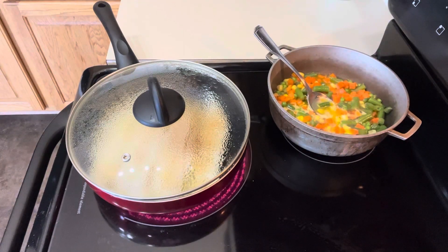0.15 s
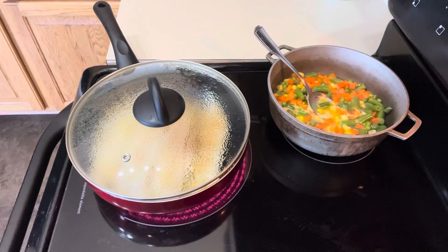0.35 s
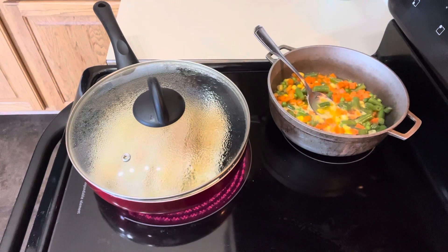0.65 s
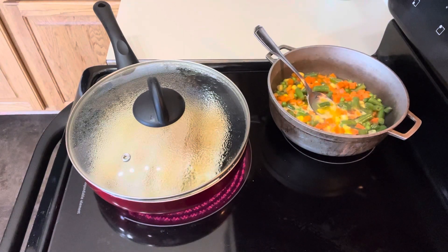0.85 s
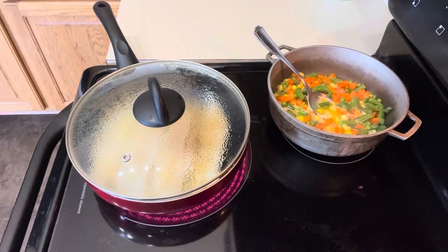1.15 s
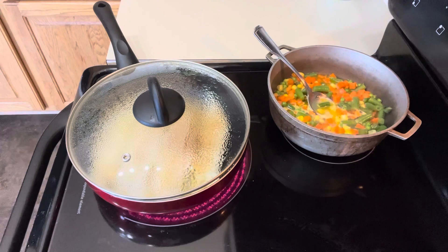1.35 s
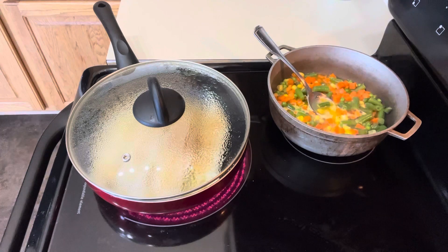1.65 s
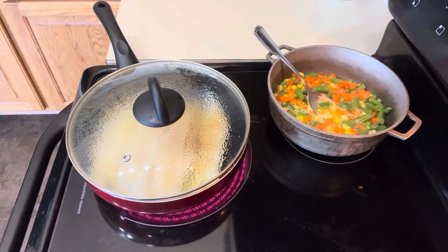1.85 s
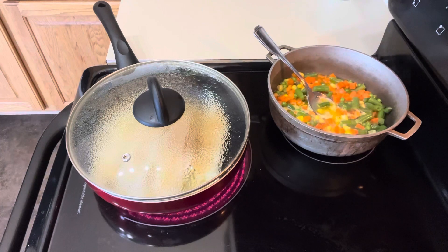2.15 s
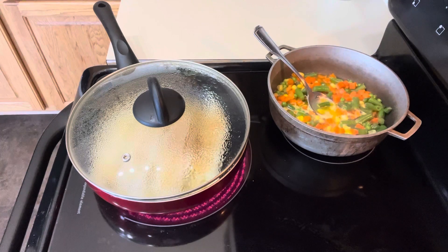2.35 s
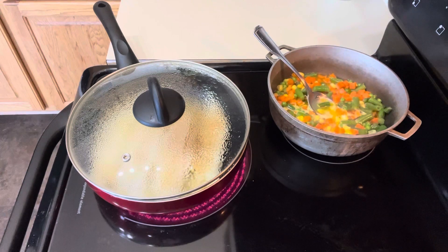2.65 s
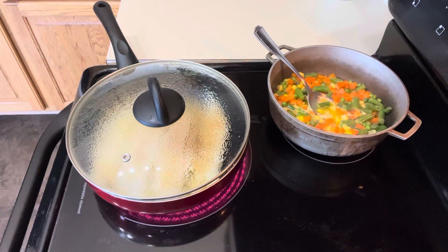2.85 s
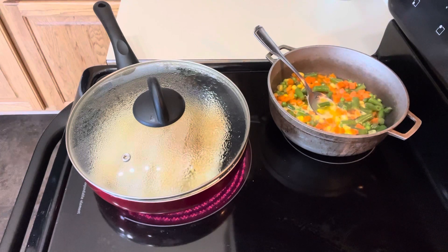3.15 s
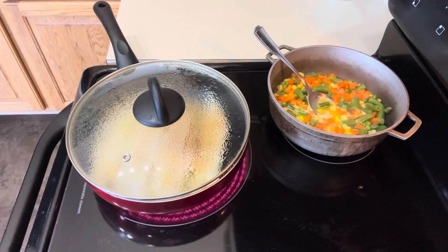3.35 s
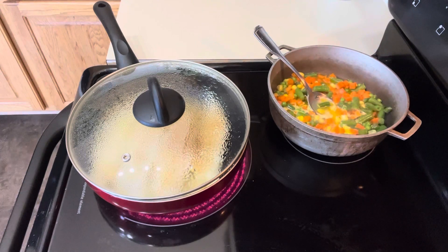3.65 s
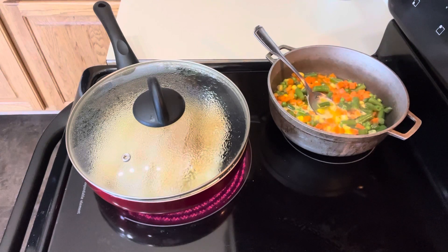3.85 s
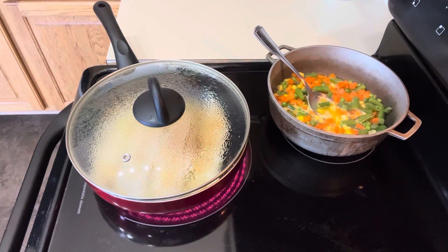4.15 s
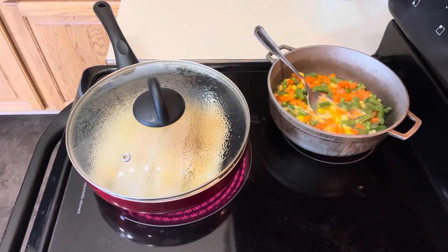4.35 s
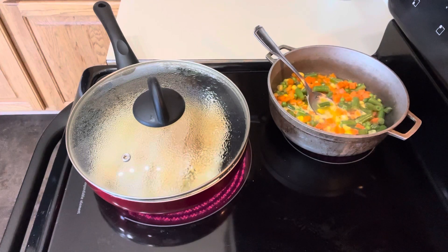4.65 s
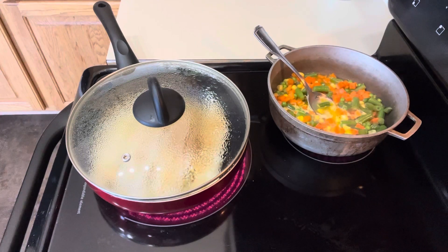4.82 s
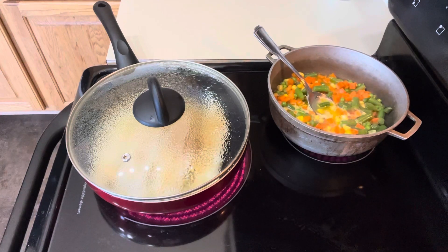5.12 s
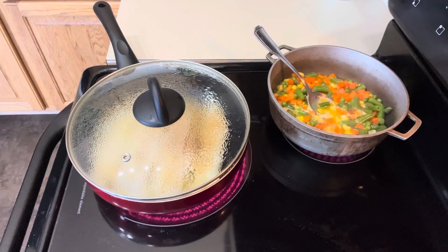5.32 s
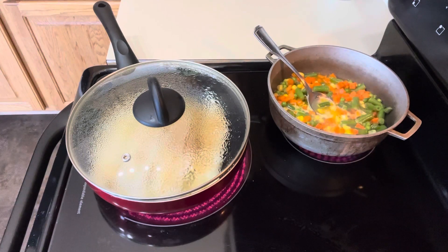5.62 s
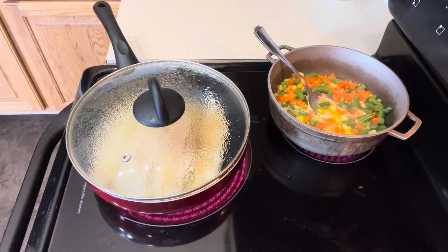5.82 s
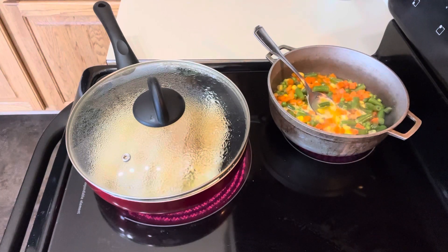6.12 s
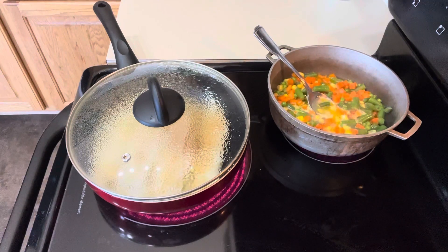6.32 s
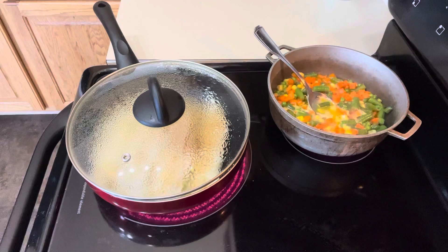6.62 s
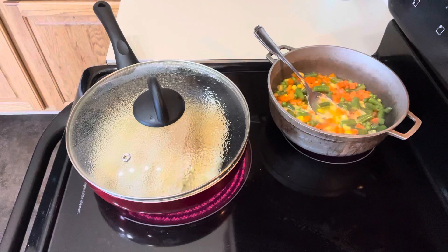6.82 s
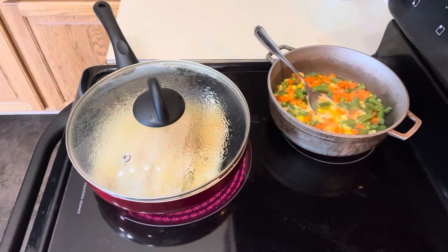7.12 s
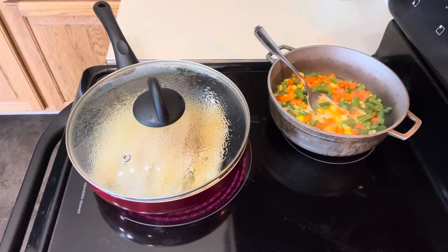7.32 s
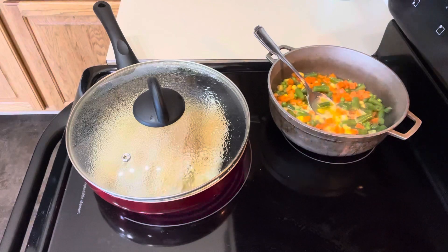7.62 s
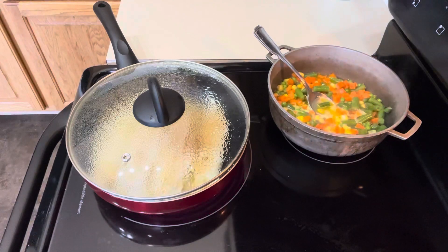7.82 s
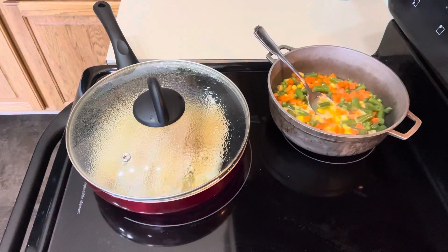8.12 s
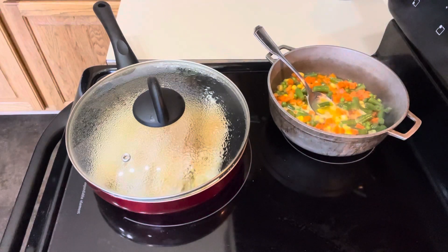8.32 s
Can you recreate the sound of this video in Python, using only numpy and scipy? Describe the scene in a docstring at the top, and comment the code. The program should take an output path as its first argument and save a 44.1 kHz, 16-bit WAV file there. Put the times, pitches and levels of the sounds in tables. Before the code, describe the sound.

A faint, fine sizzle of food frying in butter under a lid runs from start to finish, shimmering with tiny bubble crackles and a hollow pan resonance, slowly rising a little. Low room noise and a soft burner hum sit beneath; a second burner joins the hum from 3 to 6 s, and the first stops about 6.6 s. Close dull hand bumps and scrapes cluster in the first 0.8 s, strongest near 0.4, and again at 1.1. Two airy steam puffs pass at 1.5-1.6, faint steps and a rustle near 2.1. Hollow finger taps and scuffs come at 2.9, 3.9, 4.9-5.1 and 5.9. Small fat spits snap at 3.1, 3.75, 5.8 and 6.3. At 7.2 a spit sprays, then at 7.27 a loud, sharp wooden knock with a brief rattle and short kitchen reverberation. A deep, soft footfall thuds at 8.1.

```python
"""Fish fries quietly in butter under a glass lid on an electric stove, heard at a hand-held camera's two microphones.
From the start noise and bubble clicks sizzle through the pan's resonances, over low room noise and a burner's hum;
soft bumps and taps ring the camera body as dying sines, noise makes scrapes and rustles, and fat spits now and then.
Two puffs of steam pass at 1.5 s, faint steps at 2 s, and a second burner's sine hums from 3 to 6 s.
Late on, wood modes and room noise make one firm knock, then dying floor modes make a deep footfall."""
import sys
import numpy as np
from scipy import signal
from scipy.fft import rfft, irfft, next_fast_len
from scipy.io import wavfile
from scipy.ndimage import uniform_filter1d

SR = 44100
rng = np.random.default_rng(int(sys.argv[2]) if len(sys.argv) > 2 else 0)


def wav_out(sig):
    """Save sig, one row per channel (or a flat mono array), as 16-bit PCM at SR to the path in sys.argv[1]."""
    wavfile.write(sys.argv[1], SR, np.round(np.clip(np.atleast_2d(sig).T, -1, 1) * 32767).astype(np.int16))


N = 373517
TIME = np.arange(N) / SR

# noise colour of dull contact with the camera case: f/Hz, level/dB
TAP_COLOUR = [(100, -8), (220, -1), (320, 3), (440, -14), (575, 3), (700, -16), (900, -8), (1500, -24),
              (4000, -49)]


def amp(db):
    """Turns decibels into an amplitude factor."""
    return 10 ** (np.asarray(db) / 20)


def unit(x):
    """Scales to rms 1."""
    return x / np.sqrt(np.mean(x ** 2) + 1e-20)


def read(points, hz):
    """Reads a spectrum on a log-frequency axis."""
    f, value = np.transpose(points)
    return np.interp(np.log(hz + 1), np.log(f + 1), value)


def add(mix, s, sound):
    """Mixes a sound in at time s."""
    start = max(round(s * SR), 0)
    part = mix[:, start:][:, :sound.shape[-1]]
    part += sound[..., :part.shape[1]]


def drift(low_hz, high_hz):
    """Slow random wander of rms 1, summed from sines that weaken towards the fast end."""
    t = TIME[::128]
    rates = np.geomspace(low_hz, high_hz, 24)
    waves = sum(np.sin(2 * np.pi * (f * t + rng.random())) / np.sqrt(f) for f in rates)
    return np.interp(TIME, t, unit(waves))


def swell(middle, half):
    """A smooth rise and fall of height 1, down to 1/e at half seconds from its middle."""
    return np.exp(-((TIME - middle) / half) ** 2)


def ports(pair, gain, spread=1):
    """Colours two unrelated signals by gain(Hz) and blends them as the two microphone ports hear them."""
    # likeness of the two ports before the spread power: f/Hz, likeness/0-1
    likeness = [(50, .97), (400, .88), (600, .5), (1100, .55), (1500, .25), (1780, .65), (2100, .25),
                (2350, .7), (2600, .12), (3000, .35), (3500, .3), (5200, .15), (6700, .35), (7200, .82),
                (7700, .98), (8200, .98), (9900, .55), (10600, .99), (12200, .99), (13300, .55), (14800, 1)]
    # phase by which the left port leads: f/Hz, lead/rad
    lead = [(50, 0), (400, -.35), (1800, 0), (2350, -3), (2950, -2), (3500, 0), (5400, .3), (6400, 2.7),
            (8200, 3.2), (9700, 4.5), (10600, 6.2), (12300, 6.3), (13200, 7.2), (14700, 9.4)]
    # left port over right port: f/Hz, level/dB
    balance = [(50, -2.5), (150, -4.5), (330, -3), (480, -7), (750, -2), (1100, -4.5), (1600, 0),
               (2400, -1.5), (3500, -2), (6200, -4), (7800, -2), (15000, 0.5)]
    size = next_fast_len(pair.shape[1])
    hz = np.fft.rfftfreq(size, 1 / SR)
    a, b = rfft(pair, size)
    same = np.clip(read(likeness, hz), 0, 1) ** spread
    side = amp(read(balance, hz) / 2)
    right = (same * a + np.sqrt(1 - same ** 2) * b) * np.exp(-1j * read(lead, hz))
    blend = np.array([a * side, right / side])
    return irfft(blend * gain(hz), size)[:, :pair.shape[1]]


def hiss(colour, size, spread=1):
    """Stereo noise of rms 1 with a given colour."""
    white = rng.standard_normal((2, size))
    return unit(ports(white, lambda hz: amp(read(colour, hz)), spread))


def burst(colour, t60, rise):
    """A short coloured noise that starts softly and dies away by 60 dB in t60 seconds."""
    t = np.arange(SR // 3) / SR
    return hiss(colour, size=len(t)) * amp(-60 * t / t60) * (1 - np.exp(-t / rise))


def ring(modes, rise):
    """Dying sines, started softly; the right port is nearer."""
    t = np.arange(SR) / SR
    tone = sum(amp(db - 60 * t / t60) * np.sin(2 * np.pi * hz * t) for hz, db, t60 in modes)
    return tone * (1 - np.exp(-t / rise)) * amp([[-1.6], [1.4]])


def reverberation(colour):
    """The kitchen's tail: each band of a noise dies at its own speed."""
    # decay of the kitchen: f/Hz, t60/s
    room = [(60, 0.96), (150, 0.77), (400, 0.5), (1000, 0.52), (3000, 0.53), (8000, .2)]
    # sound from all around is less alike in the two ports, hence the power on their likeness
    diffuse = hiss(colour, size=SR, spread=4.7)
    hz, t, z = signal.stft(diffuse, SR, nperseg=512)
    decay = amp(-60 * t / read(room, hz)[:, None])
    tail = signal.istft(z * decay, SR, nperseg=512)[1][:, :SR]
    return tail * (1 - np.exp(-TIME[:SR] / 0.0012))


def from_side(pair, lag_s):
    """A sound from the right reaches the left port a little later."""
    return np.array([np.interp(TIME - lag_s, TIME, pair[0]), pair[1]])


def bubbles(per_s, spread_db):
    """Tiny bursting bubbles: random clicks, a few much larger than the rest."""
    size = amp(spread_db * np.minimum(rng.exponential(1, (2, N)), 5))
    sign = rng.choice([-1, 1], (2, N))
    bursts_now = rng.random((2, N)) < per_s / SR
    return unit(size * sign * bursts_now)


def flicker(x, depth_db):
    """Random patches of the spectrum swell and fade, so the sizzle shimmers."""
    z = signal.stft(x, SR, nperseg=512)[2]
    patches = rng.standard_normal(z.shape[1:])
    patches = uniform_filter1d(patches, size=7, axis=0)  # across frequency
    patches = uniform_filter1d(patches, size=9, axis=1)  # across time
    return signal.istft(z * amp(depth_db * unit(patches)), SR, nperseg=512)[1][:, :N]


def frying():
    """A dense fizz with crackles, and the air ringing under the lid; both grow steadily as the pan heats."""
    # colour of the open sizzle: f/Hz, level/dB
    sizzle = [(300, -115), (1000, -99.5), (2000, -99.5), (2600, -99), (3200, -96), (5000, -97.5),
              (6400, -92.5), (7800, -99), (8900, -93), (10300, -99), (12200, -95.5), (13300, -94),
              (14600, -95.5), (15700, -106)]
    # air resonances of the covered pan: f/Hz, width/Hz, level/dB
    pan = [(377.8, 43, -75), (503, 18.4, -81), (684, 56, -85), (915, 27, -94), (1060, 38, -85.5),
           (1113, 44, -82.3), (1769, 42, -89), (2370, 56, -90), (2796, 99, -91.5), (2958, 62, -90),
           (3130, 50, -96.5), (3553, 123, -91.5), (3983, 64, -94.5), (4235, 64, -96.5), (4717, 127, -92),
           (5365, 65, -95), (5500, 50, -95), (5930, 55, -91.5), (6500, 53, -100)]
    heat_start_db, heat_db_per_s = -1, 0.2932

    def cavity(hz):
        return sum(amp(db) / (1 + 1j * (hz - f) / width) ** 2 for f, width, db in pan)

    fizz = 0.75 * rng.standard_normal((2, N)) + 0.6 * bubbles(per_s=2500, spread_db=3.0)
    direct = ports(fizz * amp(0.16 * drift(4.2, 27)), lambda hz: amp(read(sizzle, hz)))
    pops = bubbles(per_s=3000, spread_db=3) * amp(0.31 * drift(0.92, 16))
    hollow = ports(pops, cavity, spread=0.95)
    heat = amp(heat_start_db + heat_db_per_s * TIME)
    return flicker(direct + hollow, depth_db=1.67) * heat * np.sqrt(SR / 2)  # from dB per Hz


def kitchen():
    """Low room noise and the burners' hum at twice the mains frequency, both wandering in level."""
    # colour of the room noise: f/Hz, level/dB per Hz before the wander
    room_noise = [(18, -108), (30, -84), (45, -82.5), (100, -79.5), (180, -78.5), (240, -82.5), (330, -84),
                  (560, -95), (900, -93.5), (1400, -100), (3000, -112), (8000, -125)]
    # burners: on t/s, off t/s, hum level/dB
    burners = [(-3, 6.65, -62), (3, 6, -62.5)]
    switch_s = .15  # the hum swells and fades over this time
    air = ports(rng.standard_normal((2, N)), lambda hz: amp(read(room_noise, hz))) * np.sqrt(SR / 2)
    power = 0
    for on, off, db in burners:
        inside_s = np.minimum(TIME - on, off - TIME)
        power = power + amp(db) * np.clip(inside_s / switch_s + .5, 0, 1)
    hum = np.sqrt(2) * np.sin(2 * np.pi * 120 * TIME) * power * amp(1.4 * drift(0.52, 7.2))
    return air * amp(0.4 * drift(0.91, 6.2)) + hum * amp([[-3], [1]])


def bump(hz, hardness):
    """The hand thuds and rings the camera body; a harder contact adds a dull scuff and a faint room tail."""
    # modes of the camera body: multiple of the bump's pitch, level/dB, t60/s
    body = [(0.8, -10.5, 0.096), (1, 2.5, 0.064), (1.5, -13.5, 0.056)]
    # low thud of the hand on the camera: f/Hz, level/dB
    push = [(25, -22), (45, 0), (75, 5.5), (105, 7), (150, -7), (300, -38)]
    contact_s = 0.0053  # softness of the skin's contact
    scuff_db = np.interp(hardness, (0, 1), (-25, 7))  # from soft to hard
    push_db = np.interp(hardness, (0, 1), (-16, -23.5))
    out = amp(3.5) * ring([(hz * k, db, t60) for k, db, t60 in body], rise=contact_s)
    add(out, 0, amp(push_db) * burst(push, t60=0.31, rise=0.0053))
    add(out, 0, amp(scuff_db) * burst(TAP_COLOUR, t60=0.099, rise=contact_s))
    add(out, 0, amp(scuff_db - 15.5) * reverberation(TAP_COLOUR))
    return out


def handling():
    """The hand bumps the camera as the grip shifts, finger pressure setting the pitch; skin scrapes drily."""
    # bumps of the hand: t/s, strength/dB, pitch f/Hz, hardness/0-1
    bump_list = [(.001, -33, 203, 0.76), (.014, -36, 190, 0.73), (0.038, -34.5, 195, 0.46),
                 (0.053, -38, 207, 0.5), (0.078, -38, 220, 0.7), (0.092, -32, 223, 0.5),
                 (.118, -32.5, 198, .25), (.146, -32.5, 203, 0.33), (.157, -39, 217, 0.3),
                 (.202, -32.5, 199, 0.57), (.246, -42.5, 260, 0.64), (.416, -20.5, 206.5, 0),
                 (0.4345, -32, 216, 0.15), (.448, -29, 193, 0), (0.601, -38, 226, .1),
                 (.618, -35.5, 218, 0), (.665, -39.5, 172, 0.3), (.763, -42, 172, 0.62),
                 (1.061, -33, 186, .1), (1.093, -29.5, 209, 0.16), (1.107, -37, 200, .3),
                 (1.136, -30.5, 211, 0.2), (1.152, -37, 227, 0.4), (1.1612, -34.5, 235, 0.1),
                 (1.187, -32, 203, 0.3), (1.218, -41, 262, 0.1), (3.006, -40.5, 170, 0.4),
                 (3.025, -38, 150, .2), (3.870, -35, 214, 0.7), (3.876, -30, 218, 0.71),
                 (3.889, -28.5, 176, 0.4), (3.905, -27, 190, 0.43), (3.930, -42, 200, 0.5),
                 (4.854, -26.5, 198, 0.4), (4.863, -26.5, 202.5, 0.5), (4.889, -33.5, 213, 0.45),
                 (5.531, -40.5, 302, 0.6), (6.363, -36.5, 157, 0.1), (6.392, -38.5, 147, 0.4)]
    # dry scrapes of skin on the case: t/s, level/dB, centre f/Hz, t60/s
    scrapes = [(.001, -43, 940, 0.059), (.008, -41.5, 560, .09), (.078, -43, 570, .08),
               (.088, -41, 570, .08), (.096, -48, 1500, .04), (.157, -47, 1300, .04),
               (.198, -42, 800, .064), (.419, -49, 900, .08), (1.095, -49, 950, .07),
               (1.129, -44, 1100, .05), (2.084, -45, 2100, .02), (2.086, -44, 780, 0.072),
               (2.932, -41.5, 720, .045), (3.863, -40, 1550, .03), (3.863, -37.5, 750, 0.044),
               (3.873, -35, 570, .08), (3.884, -32, 300, .12), (3.883, -41, 2300, 0.041),
               (3.885, -42, 950, .04), (3.891, -47, 3900, 0.037), (3.900, -47, 1450, .064),
               (3.915, -47.5, 3500, .05), (4.850, -39, 1600, .02), (4.856, -45, 1100, .04),
               (4.869, -48, 1700, .05), (4.870, -41, 540, .08), (4.990, -39.5, 640, .028)]
    # colour of a scrape: multiple of its centre frequency, level/dB
    scrape_shape = [(.25, -2.5), (.7, -8), (.9, -2.5), (1, 0), (1.12, -4.5), (1.4, -16), (2.6, -22),
                    (6, -50)]
    out = np.zeros((2, N))
    for s, db, hz, hardness in bump_list:
        add(out, s, amp(db) * bump(hz, hardness))
    for s, db, hz, t60 in scrapes:
        colour = [(hz * k, level) for k, level in scrape_shape]
        add(out, s, amp(db) * burst(colour, t60, rise=0.00028))
    return out


def rustles():
    """Cloth and fingers slide in short, smooth swells of dull and papery noise."""
    # soft rustles of movement: middle t/s, half length/s, level/dB, papery part relative to the dull/dB
    rustle_list = [(0.065, 0.11, -53.5, -17), (1.126, 0.032, -48.5, -11), (2.034, 0.021, -54, -13),
                   (2.13, 0.031, -54, -9), (2.796, 0.035, -50.5, -25), (3.0, 0.06, -49.5, -21),
                   (4.015, 0.18, -52.5, -16), (4.829, 0.041, -45.5, -22), (6.392, 0.03, -53, -3.5),
                   (8.004, 0.023, -53, .5)]
    # colour of the dull part: f/Hz, level/dB
    dull_colour = [(80, -12), (150, 1.5), (380, 5.5), (600, -9), (900, -8.5), (1500, -24), (4000, -60)]
    # colour of the papery part: f/Hz, level/dB
    papery_colour = [(500, -24), (1200, 1), (2400, 1), (3600, -3), (6000, -28)]
    dull = hiss(dull_colour, size=N)
    papery = hiss(papery_colour, size=N)
    return sum(amp(db) * swell(s, half) * (dull + amp(papery_db) * papery)
               for s, half, db, papery_db in rustle_list)


def spits():
    """Droplets burst in the fat as short noises; the last sprays for a moment."""
    # spits of fat: t/s, level/dB, t60/s
    spit_list = [(.448, -41, .007), (3.107, -34, 0.013), (3.7553, -30, 0.0057), (5.0638, -46, .01),
                 (5.529, -43, .007), (5.7703, -38, .01), (6.2925, -32, .012), (7.165, -32, 0.092)]
    # colour of a spit: f/Hz, level/dB
    spit_colour = [(400, -6), (1200, -1), (4500, -9.5), (8000, 0), (13000, -6), (16000, 2.5)]
    out = np.zeros((2, N))
    for s, db, t60 in spit_list:
        add(out, s, amp(db) * burst(spit_colour, t60, rise=0.00062))
    return out


def steam():
    """Two brief puffs of vapour from under the lid's rim, as swells of bright noise."""
    # puffs: middle t/s, half length/s, level/dB
    puffs = [(1.51, 0.037, -51.5), (1.622, 0.043, -52)]
    flow = sum(amp(db) * swell(s, half) for s, half, db in puffs)
    return hiss([(1500, -5), (4000, 5), (7000, 12), (10000, 7), (15000, 3.0)], size=N) * flow


def taps():
    """A fingertip strikes the case with a short hollow ring, pitched by where it lands, then comes to rest."""
    # crisp taps: t/s, ring level/dB, multiple of the case's modes, softness/s
    tap_list = [(2.086, -42, 1, .002), (2.932, -31.5, 1.1, .002), (3.862, -40, 1.3, 0.0017),
                (4.990, -29.5, 1.0, .0014), (5.111, -30.5, .88, 0.0025), (5.866, -38, .62, .002)]
    # modes of the camera case: f/Hz, level/dB, t60/s
    case = [(238, -8, 0.082), (336, 4.5, 0.032), (414, -1, 0.023), (552, -4.5, 0.036), (750, -20, 0.02)]
    out = np.zeros((2, N))
    for s, ring_db, pitch, soft_s in tap_list:
        modes = [(hz * pitch, db, t60) for hz, db, t60 in case]
        add(out, s, amp(ring_db) * ring(modes, rise=soft_s))
        add(out, s, amp(ring_db - 22) * reverberation(TAP_COLOUR))
        # the finger comes to rest with a soft bump 28 ms later
        add(out, s + 0.028, amp(ring_db - 12) * bump(hz=265, hardness=0.27))
    return out


def footfall():
    """Soft steps set the floor swinging, each ringing its low modes; one late pair is far the strongest."""
    # steps: t/s, level/dB
    steps = [(2.09, -49), (2.287, -52), (6.931, -47), (7.555, -41.5), (8.116, -23.5), (8.146, -30.5),
             (8.349, -42.5)]
    # modes of the floor: f/Hz, level/dB, t60/s
    floor = [(42, -8, 0.48), (52.3, -1, 0.37), (76.6, 1, 0.29), (98.5, -10, 0.22), (116, -17, .17)]
    out = np.zeros((2, N))
    for s, db in steps:
        add(out, s, amp(db) * ring(floor, rise=0.012))
    return out


def bending_wave():
    """The panel carries treble faster than bass, so the blow arrives as a crack that falls in pitch."""
    start_hz, end_hz, fall_s = 3080, 590, 0.000846
    level_db, rise_s, t60_s = -12.5, 0.00044, 0.023
    t = np.arange(SR // 8) / SR
    hz = end_hz + (start_hz - end_hz) * np.exp(-(t / fall_s) ** 2)
    level = amp(level_db - 60 * t / t60_s) * (1 - np.exp(-(t / rise_s) ** 2))
    return level * np.sin(2 * np.pi * np.cumsum(hz) / SR) * amp([[-1], [1]])


def knock(s, room_db):
    """A firm blow on wood: a sharp crack, a dry rattle, the panel's modes with the bass building last, the room."""
    # contacts, a graze, the blow, then a loose rattle: t/s, level/dB
    contacts = [(7.262, -29), (7.2658, -29), (7.272, -27), (7.2777, -30), (7.296, -41), (7.319, -45),
                (7.332, -40), (7.360, -37.5)]
    # colour of each contact: f/Hz, level/dB
    crack_colour = [(200, -4), (420, 7), (600, 7), (760, 2), (1150, 4), (1400, 0), (1600, -6), (1950, -2),
                    (2700, -3.5), (3300, -15), (4500, -26), (8000, -55)]
    # modes of the knocked wood: f/Hz, level/dB, t60/s, delay of the build-up/s
    wood = [(42, -36, .4, 0.016), (78.7, -32.5, 0.38, 0.016), (85, -18.5, 0.12, 0.0184),
            (135.4, -26, 0.44, 0.0119), (163, -37, 0.27, 0.018), (222, -24, 0.087, .0135),
            (335, -36, 0.088, .012), (354.5, -29.5, 0.345, 0.01187), (424, -17.5, 0.053, 0.00285),
            (483, -31.5, 0.33, 0.00065), (600, -28.5, 0.2, 0.0036), (831, -28, 0.11, 0.00256),
            (920, -34, .04, 0.0018), (1187, -42, 0.1, 0.00205), (1240, -41, 0.22, 0.00733),
            (1400, -33, 0.2, 0.00126), (1923, -36, 0.11, 0.0011), (2350, -40, .1, 0.00206),
            (2500, -46, 0.13, 0.0042)]
    # colour of the kitchen's answer: f/Hz, level/dB
    knock_colour = [(30, -15), (80, 4.5), (200, 1), (380, 2.5), (520, -3), (640, -1), (800, -5.5),
                    (1400, -14), (2000, -16), (3200, -25), (4500, -36), (8000, -60)]
    out = np.zeros((2, N))
    add(out, s, bending_wave())
    for at, db in contacts:
        add(out, at, amp(db) * burst(crack_colour, t60=0.039, rise=0.00034))
    for hz, db, t60, delay in wood:
        add(out, s + delay, ring([(hz, db, t60)], rise=0.34 / hz))
    add(out, s, amp(room_db) * reverberation(knock_colour))
    return from_side(out, lag_s=.00023)


def scene():
    """The stove and its kitchen, the hand on the camera, and the late knock and footfalls."""
    stove = frying() + kitchen() + spits() + steam()
    camera = from_side(handling() + rustles() + taps(), lag_s=.00032)
    return stove + camera + footfall() + knock(7.2662, room_db=-28.5)


def record(dry):
    """The recorder's rumble filter and band limit."""
    rumble_filter = signal.butter(3, 34, "highpass", fs=SR, output="sos")
    thinned = signal.sosfilt(rumble_filter, dry)
    band_limit = signal.firwin(511, 15650, window=("kaiser", 9), fs=SR)
    return signal.oaconvolve(thinned, band_limit[None], "same")


dry = scene()
out = record(dry)
wav_out(out)
```